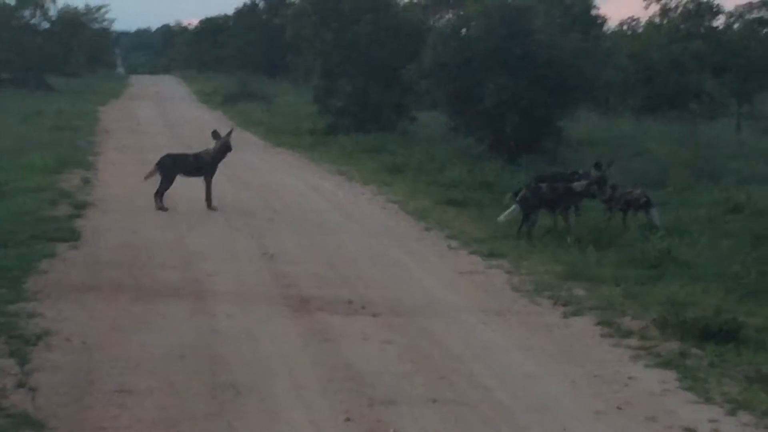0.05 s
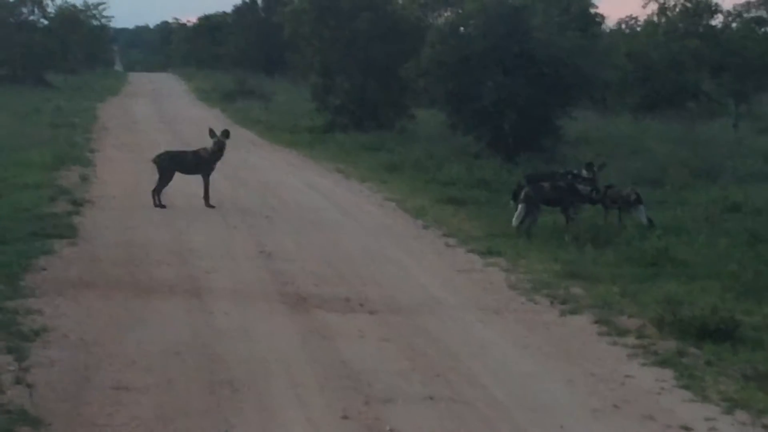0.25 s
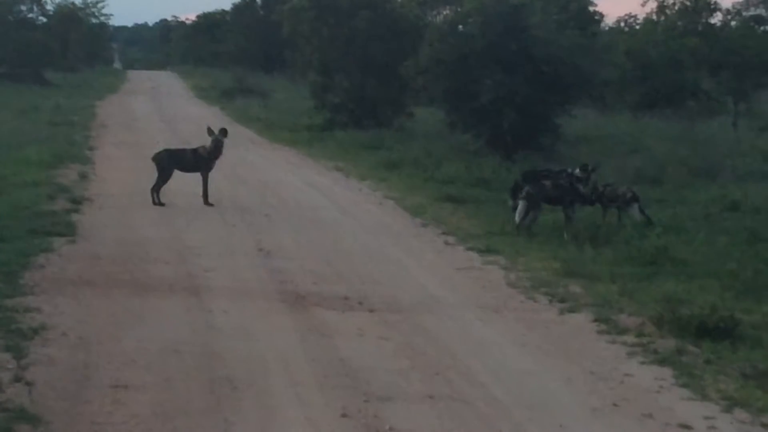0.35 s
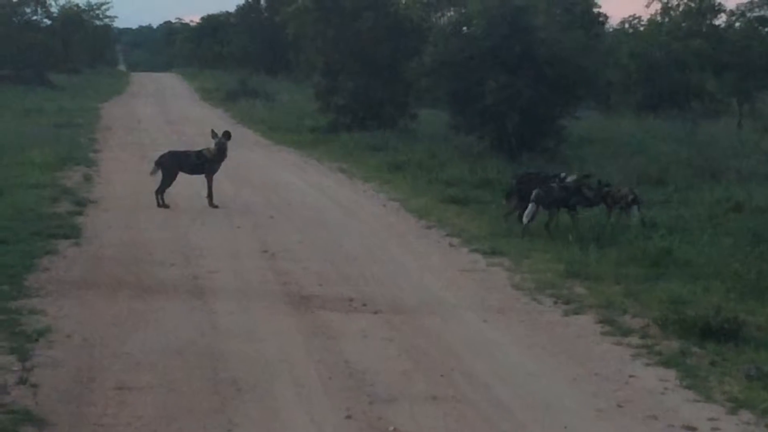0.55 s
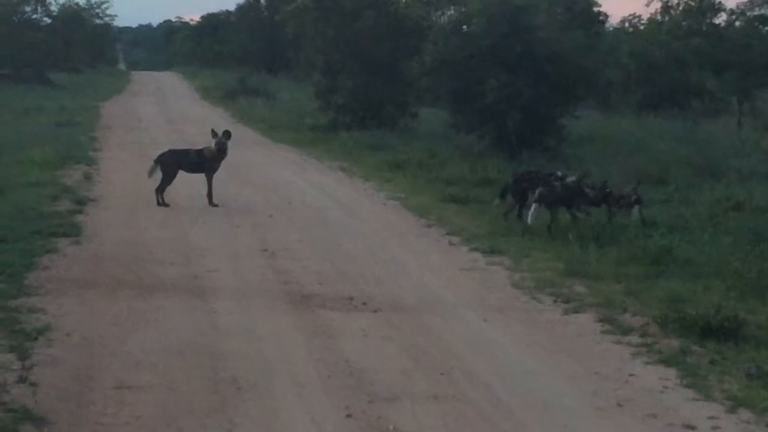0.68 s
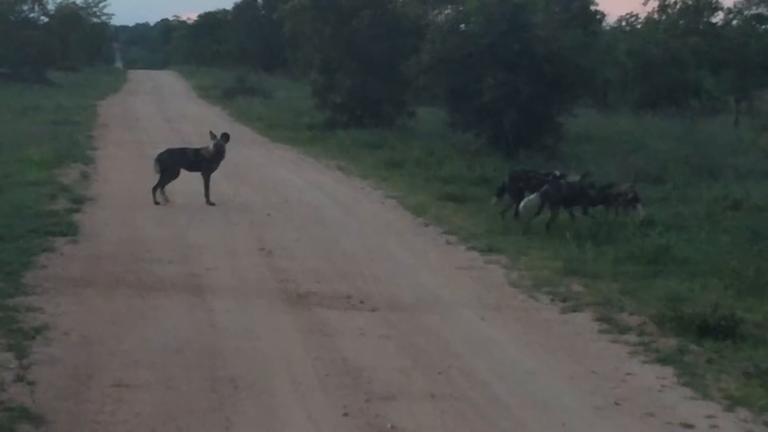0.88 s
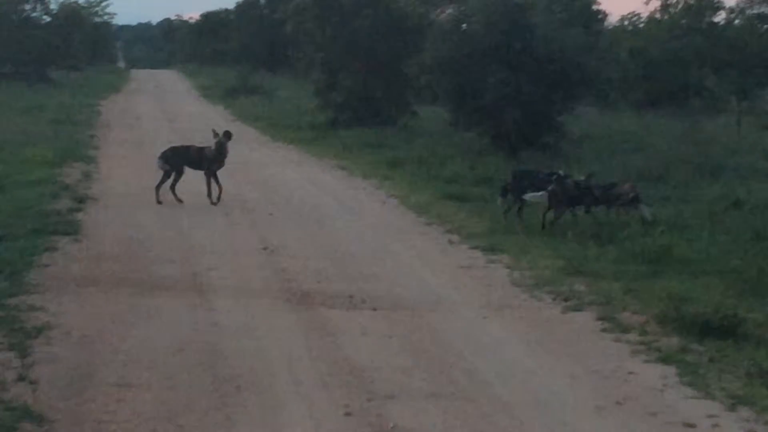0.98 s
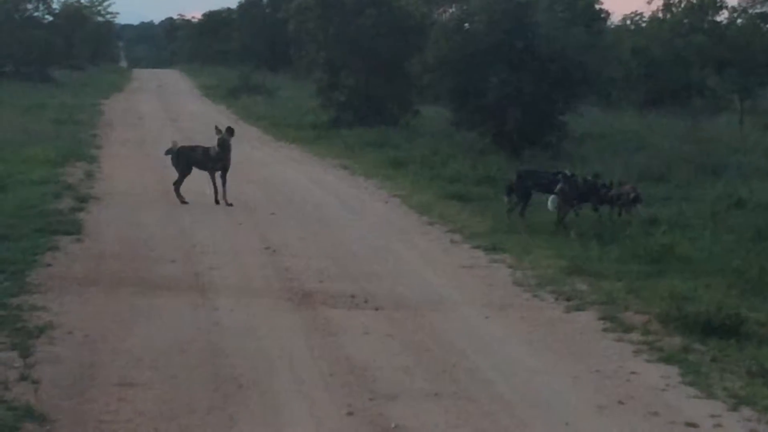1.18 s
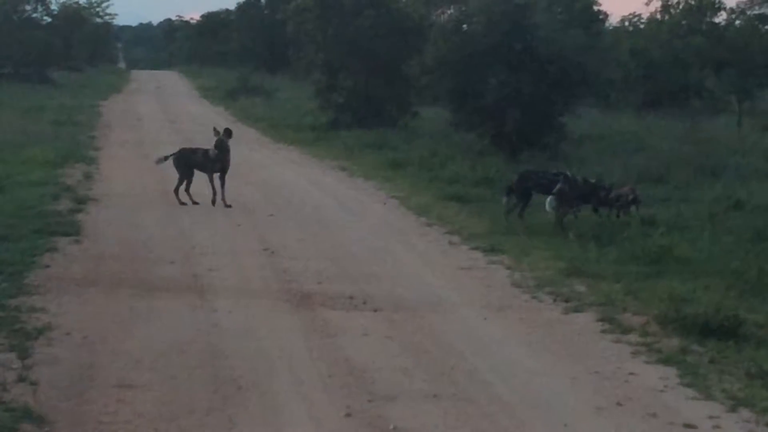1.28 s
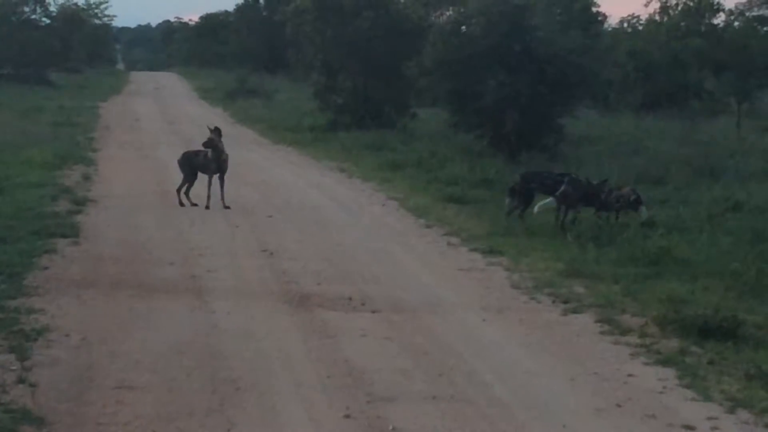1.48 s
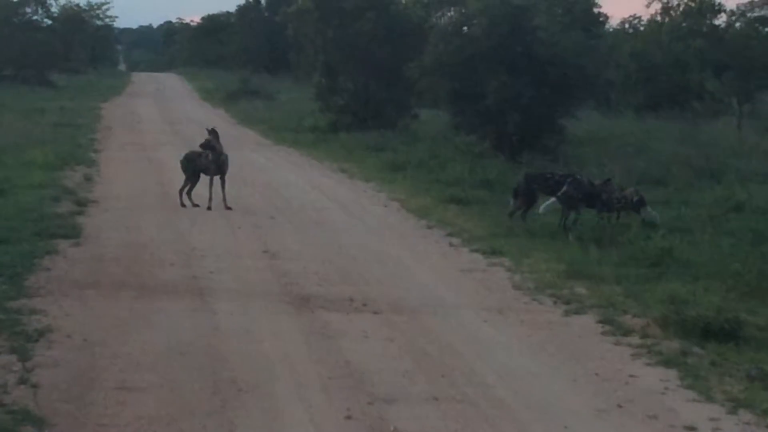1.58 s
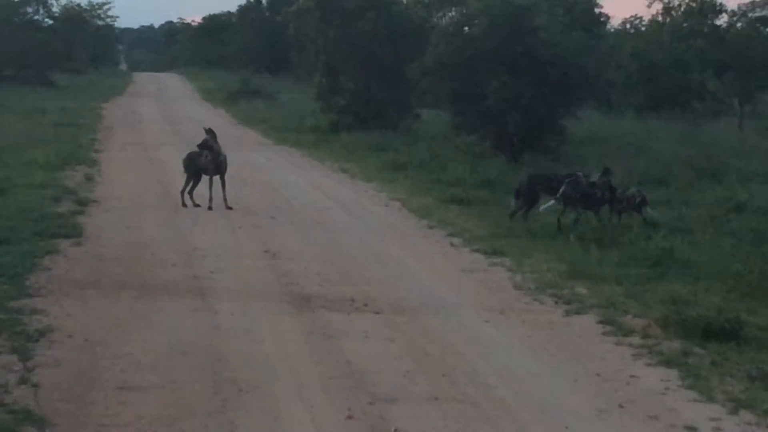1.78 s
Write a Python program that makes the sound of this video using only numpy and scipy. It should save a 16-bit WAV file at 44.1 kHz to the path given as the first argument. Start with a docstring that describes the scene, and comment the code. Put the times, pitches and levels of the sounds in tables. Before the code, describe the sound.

Wild dogs whine three times outdoors, over faint insect ticks and distant birds.

```python
"""Wild dogs whine three times on a bush track at dusk: nearly pure hoots that rasp where the voice
changes register, the last two breaking down from a thin high squeak. The trees return a faint echo.
Behind the dogs, insects tick near 4 kHz and small birds whistle far off, scattered by the foliage.
Underneath lies an even hiss, with a low rumble that fades in the first moments and returns faintly."""
import sys
import numpy as np
from scipy import signal
from scipy.fft import rfft, irfft
from scipy.io import wavfile

SR = 44100
rng = np.random.default_rng(int(sys.argv[2]) if len(sys.argv) > 2 else 0)


def dump(signal):
    """Clip the signal to [-1, 1] and save it as 16-bit WAV at the path in sys.argv[1]."""
    limited = np.clip(np.atleast_2d(signal).T, -1, 1)
    pcm = np.round(limited * 32767).astype(np.int16)
    wavfile.write(sys.argv[1], SR, pcm)


N = 81585
T = np.arange(N) / SR
TOP_HZ = 15250

# low register, a contour per hoot (time [s], pitch [Hz], level [dB], octave level [dB], roughness [0-1])
HOOTS = [
    [(.188, 623, -55, -63, 0.54), (.2, 660, -46, -62.5, 0), (.228, 755.5, -33, -65, 0.14),
     (.234, 776, -37.5, -69.5, 0.18), (.245, 743.5, -34.5, -69, 0.12), (.305, 747.3, -31.5, -70, 0.12),
     (.35, 741.3, -29.5, -55, 0.06), (.4, 734, -26, -52.5, 0.05), (.447, 733.6, -26.5, -53, 0),
     (.467, 746, -30, -69.5, 0.14), (.478, 809, -47.5, -58.5, 0.02), (.486, 746, -42.5, -76, 0.4),
     (.5, 750, -59.5, -93.5, .3)],
    [(.846, 718.6, -61, -78.5, 0.36), (.86, 733, -35.5, -61, 0), (.88, 717.6, -36, -58, 0.13),
     (.925, 701, -36.5, -49.5, 0.04), (.985, 698.2, -35, -47, 0.07), (1.016, 689.6, -29.5, -51.5, 0.05),
     (1.044, 721, -36, -52.5, 0.2), (1.055, 754, -37, -108, 0), (1.074, 696, -57.5, -75, .3)],
    [(1.335, 721.5, -64, -68, 0), (1.35, 718.7, -55.5, -84, 0.5), (1.362, 829, -40.5, -82, 0.82),
     (1.372, 828, -44.5, -94, 0.26), (1.392, 817, -70.5, -82, 0.28), (1.401, 832, -46.5, -78, 0.74),
     (1.409, 855.7, -35.5, -72, 0.04), (1.432, 869.4, -42, -64, 0.1), (1.462, 855, -41.5, -58, 0),
     (1.473, 903, -45, -56.5, 0.5), (1.483, 922, -43, -54.5, 0.88), (1.493, 859, -43, -64, 0.7),
     (1.503, 913, -59, -62, 0.5)],
]
# high register, a contour per squeak (columns as in HOOTS)
SQUEAKS = [
    [(.786, 1185, -63, -81, 0.38), (.795, 1178, -43, -72, 0.043), (.827, 1201, -39, -69.5, 0.044),
     (.85, 1177, -40, -67.5, 0.25), (.868, 1200, -77, -78, 0.54)],
    [(1.263, 1164, -66, -99, 0.049), (1.278, 1244, -49, -80.5, 0.059), (1.315, 1396, -45, -67, .04),
     (1.342, 1394, -41, -78, 0.084), (1.359, 1364, -45, -73, 0.74), (1.38, 1436, -46.5, -73, 0.066),
     (1.399, 1443, -50.5, -69, 0.27), (1.41, 1290, -53.5, -80.5, 0.73)],
    [(1.485, 1420, -54.5, -97, .6), (1.496, 1513, -53.5, -95, .3), (1.515, 1527, -59.5, -60.5, 0.29),
     (1.53, 1557, -67.5, -66.5, .2)],
]
# brightness of each hoot (overtone level before throat colour and effort [dB])
HOOT_OVERTONE_DB = [-69, -70, -67.5]
# throat colour of the upper overtones (frequency [Hz], gain [dB])
THROAT = [(2100, 2), (2900, -3.5), (3650, -10.5), (4400, -11.5), (5300, -30.5), (6100, 0.5), (6800, -5.5),
          (7600, -1), (8400, -7.5), (9200, -13), (10200, -23), (12000, -33.5), (15000, -26.5)]
# open-mouthed colour of the last hoot and the squeaks (frequency [Hz], gain [dB])
OPEN_THROAT = [(2000, 6), (2600, 4.5), (3450, 2.5), (4300, 2), (5200, 0.5), (6000, -32), (7500, -28.5),
               (10000, -27), (15000, -24)]
# hiss of air in the throat (frequency [Hz], relative level [dB])
BREATH = [(300, -11), (1100, 3), (1700, 1), (2200, 1), (3400, 1), (4500, 5.5), (5600, -4.5), (7800, -4),
          (10000, -27), (15000, -15)]
def dogs(sum_tone_db=34.5, breath_db=-66.5):
    """Both registers, their sum tone where they overlap, and the hiss of air under the hoots."""
    hoots = zip(HOOTS, HOOT_OVERTONE_DB, [THROAT, THROAT, OPEN_THROAT])
    low, flow = np.sum([whine(*hoot) for hoot in hoots], axis=0)
    high, _ = np.sum([whine(rows, -84.5, OPEN_THROAT) for rows in SQUEAKS], axis=0)
    sum_tone = signal.sosfilt(signal.butter(4, 1800, "high", fs=SR, output="sos"), low * high)
    breath = undb(breath_db) * flow * noise(lambda f: colour(f, BREATH))
    return low + high + undb(sum_tone_db) * sum_tone + breath


def whine(contour, overtone_db, throat, loud_db=-31, rasp_hz=190, nasal_hz=5000):
    """A near sine with faint overtones that rasps at register breaks. Returns sound and air flow."""
    times, *columns = np.array(contour, float).T
    hz, db, octave_db, roughness = (np.interp(T, times, column) for column in columns)
    start, end = times[0], times[-1]
    gate = np.clip(np.minimum(T - start, end - T) / .004 + 1, 0, 1)
    rasp = np.abs(roughness) ** 1.164
    hz = hz * (1 + .002 * wander(66) + .034 * rasp * wander(rasp_hz))  # pitch jitter
    phase = 2 * np.pi * np.cumsum(hz) / SR
    effort = undb(.4 * (db - loud_db))  # overtones and breath grow with the call
    progress = (T - start) / (end - start)
    bloom = np.exp(-.5 * ((progress - .52) / .27) ** 2)  # nasal overtones open up mid-call
    upper = np.zeros(N)
    for k in range(3, 19):
        gain = colour(k * hz, throat) * (k * hz < TOP_HZ)
        nasal = undb(-3) * bloom if k * hz.mean() > nasal_hz else 1
        upper += gain * nasal * undb(5.5 * wander(5.2)) * np.sin(k * phase)
    rough_partial = undb(-22.5) * roughness * wander(50) * np.sin(1.5 * phase)
    body = undb(db + .25 * wander(22)) * (np.sin(phase) + rough_partial)
    tone = body + undb(octave_db) * np.sin(2 * phase) + undb(overtone_db) * effort * upper
    shimmer = 1 + .3 * rasp * wander(rasp_hz)
    return gate * np.sqrt(2) * tone * shimmer, gate * effort * bloom


# faint hoots and late echoes (columns as in HOOTS)
FAINT_HOOTS = [
    [(0, 741, -75, -101, 0.84), (.1, 746, -84, -101, 0.25), (.16, 746, -83, -108, 0.34)],
    [(.495, 735, -59, -97, .1), (.562, 732, -60.5, -91, 0.11), (.595, 725, -89, -105, 0.26)],
]
def faint_hoots():
    """Ghosts of the dogs' tone just before and after the first call."""
    return sum(whine(rows, -88.5, THROAT)[0] for rows in FAINT_HOOTS)


# near insect ticks (time [s], level before trim [dB])
TICKS = [(.01, -58), (0.174, -49.5), (0.1925, -52), (0.2139, -47.5), (.305, -55.5), (0.331, -55),
         (0.357, -55), (.383, -60), (0.4105, -52.5), (0.429, -53), (0.452, -56), (0.4808, -58),
         (0.4983, -52.5), (0.5232, -52.5), (0.6587, -58.5), (0.6938, -49), (0.7135, -49.5), (0.732, -45.5),
         (0.755, -53), (0.773, -54), (0.7904, -51), (0.819, -60.5), (0.847, -59.5), (0.9033, -59),
         (0.9592, -53.5), (0.9795, -49), (1.0979, -48.5), (1.117, -47), (1.14, -49.5), (1.164, -60),
         (1.192, -55), (1.2152, -56.5), (1.2969, -59), (1.319, -54), (1.34, -52.5), (1.3746, -52),
         (1.3972, -54.5), (1.4222, -53.5), (1.484, -54), (1.508, -52.5), (1.532, -53.5), (1.552, -49),
         (1.5737, -50.5), (1.597, -49), (1.6752, -52), (1.701, -54.5), (1.729, -55), (1.75, -56.5),
         (1.786, -50.5), (1.808, -64.5), (1.8291, -47.5)]
def insects(near_hz=4310, trim_db=-3.5, chorus_hz=4244, chorus_per_s=480, shrill_hz=10150):
    """Grainy near ticks over a slowly swelling chorus of far ones and a thin shrill tone."""
    near, far = np.zeros(N), np.zeros(N)
    for (time, db), scatter in zip(TICKS, rng.standard_normal(len(TICKS))):
        hz = near_hz + 54 * scatter + 23.5 * (db + 51.5)  # louder ticks are higher
        add(near, time - .0093, undb(db + trim_db) * tick(hz))
    for position, pitch, size in rng.random((int(chorus_per_s * N / SR), 3)):
        hz = chorus_hz + 210 * (2 * pitch - 1)
        add(far, position * N / SR - .014, (.16 + size) * tick(hz))
    shrill_gain = undb(-84 + 3 * wander(5.2))
    shrill = shrill_gain * np.sin(2 * np.pi * np.cumsum(shrill_hz + 55.3 * wander(2.8)) / SR)
    grain = 1 + .29 * wander(160)
    chorus = undb(-68.5 + 2.5 * wander(.83)) * far / far.std()
    return near * grain + chorus + shrill


def tick(hz, length_s=.028, fall_hz_per_s=28300):
    """A short swelling pulse that falls in pitch, with a faint third harmonic."""
    t = np.arange(int(length_s * SR)) / SR
    phase = 2 * np.pi * np.cumsum(hz - fall_hz_per_s * (t - length_s / 2)) / SR
    return np.sin(np.pi * t / length_s) ** 2 * (np.sin(phase) + undb(-26.5) * np.sin(3 * phase))


# bird whistles (time [s], length [s], start pitch [Hz], middle pitch [Hz], end pitch [Hz], level [dB])
BIRDS = [(0.171, 0.051, 6800, 6500, 6400, -60.5), (0.427, 0.062, 2750, 2600, 2533, -57),
         (0.471, 0.039, 7300, 6300, 6200, -67.5), (.497, 0.068, 3770, 3400, 3420, -64.5),
         (.54, 0.13, 3330, 3235, 3210, -65), (0.646, 0.072, 2620, 2450, 2410, -60),
         (0.688, 0.06, 2400, 2250, 1730, -65.5), (0.737, 0.044, 7000, 7150, 7240, -68.5),
         (0.83, 0.02, 7800, 8150, 8500, -64.5), (.9, .025, 2700, 3200, 3650, -72),
         (.918, .035, 2490, 3210, 3560, -67.5), (.955, 0.027, 3060, 2740, 2260, -68),
         (1.045, 0.032, 6710, 6450, 6810, -67), (1.519, 0.029, 8300, 6050, 5830, -67.5),
         (1.72, 0.035, 6950, 7100, 7510, -62), (1.75, 0.1, 7500, 6500, 6500, -68),
         (1.76, 0.25, 2750, 2620, 2880, -78)]
# soft low falling notes from the bush (columns as in BIRDS)
LOW_NOTES = [(.478, 0.025, 474, 430, 342, -64.5), (.82, 0.032, 508, 416, 324, -64),
             (1.785, 0.061, 496, 403, 294, -67)]
def whistles(notes):
    """Thin curved notes that swell and fade, flickering in pitch and level."""
    out, waver = np.zeros(N), 1 + .008 * wander(100)
    for time, length, *pitches, db in notes:
        progress = np.clip((T - time) / length, 0, 1)
        hz = np.polyval(np.polyfit([0, .5, 1], pitches, 2), progress) * waver
        swell = 4 * progress * (1 - progress)
        out += undb(db) * np.sqrt(2) * swell * np.sin(2 * np.pi * np.cumsum(hz) / SR)
    return out * undb(2 * wander(69.4))


def bush_echo(x, t60_s=1.3, build_s=.06, low_hz=1280, top_hz=2500):
    """Diffuse echo from the trees; soft ground swallows its low end."""
    wash = noise(lambda f: f ** 2 / (f ** 2 + low_hz ** 2) / np.hypot(1, f / top_hz))
    return reverberate(x, wash * undb(-60 * T / t60_s) * np.minimum(T / build_s, 1))


def leaves(x, scatter_db, t60_s=.08):
    """A far sound plus its short scatter in the foliage."""
    tail = rng.standard_normal(N) * undb(-60 * T / t60_s)
    return x + undb(scatter_db) * reverberate(x, tail)


# fader ride of the rumble (time [s], level [dB])
RUMBLE = [(0, -62.5), (.15, -67.5), (.25, -78), (.45, -92), (1.0, -92.5), (1.18, -77.5), (1.85, -83)]
def rumble(centre_hz=70, width_hz=25):
    """A narrow band of bass noise that sinks away and creeps back."""
    band = noise(lambda f: 1 / (1 + ((f - centre_hz) / width_hz) ** 2))
    return undb(np.interp(T, *np.array(RUMBLE).T)) * band


# bed of still air and distant insects (frequency [Hz], relative level [dB])
AIR_BED = [(25, -26.5), (65, 1), (150, 5.5), (300, 2.5), (700, -2), (1200, -3.5), (2000, -6), (3300, -8),
           (5500, -8), (6800, -7.5), (8300, -0.5), (10200, -3.5), (11200, -11), (15000, -16)]
def air_bed(level_db=-69):
    """Even hiss with a slight flutter in level."""
    return undb(level_db + 1.4 * wander(8)) * noise(lambda f: colour(f, AIR_BED))


def undb(db):
    """Decibels to gain."""
    return 10 ** (np.asarray(db) / 20)


def colour(hz, points):
    """Gain of an EQ curve of (frequency [Hz], gain [dB]) points."""
    f, db = np.array(points, float).T
    return undb(np.interp(np.log(hz + 1), np.log(f), db))


def noise(gain):
    """Noise of rms 1 with the spectrum gain(Hz)."""
    y = irfft(rfft(rng.standard_normal(N)) * gain(np.arange(N // 2 + 1) * SR / N), N)
    return y / y.std()


def wander(hz):
    """Smooth random modulation up to about the given rate."""
    return noise(lambda f: np.exp(-.5 * (f / hz) ** 2))


def reverberate(x, tail):
    """Convolve with a tail scaled to unit energy."""
    return signal.fftconvolve(x, tail / np.sqrt(np.sum(tail ** 2)))[:N]


def add(out, start, sound):
    """Place a sound at a time in seconds."""
    i = int(start * SR)
    a, b = max(i, 0), min(i + len(sound), N)
    if b > a:
        out[a:b] += sound[a - i:b - i]


def scene():
    """Dogs up front, everything else far off, in mono."""
    calls, birds, faint = dogs(), whistles(BIRDS), faint_hoots()
    far = leaves(birds + whistles(LOW_NOTES), scatter_db=-4) + leaves(insects(), scatter_db=-15)
    echo = bush_echo(undb(-32) * calls + undb(-20.5) * birds)
    return (calls + faint + echo + far + rumble() + air_bed())[None]


def record(dry):
    """A steep low-pass cuts the top."""
    return signal.sosfilt(signal.ellip(10, .2, 80, TOP_HZ, fs=SR, output="sos"), dry)


dry = scene()
out = record(dry)
dump(out)
```